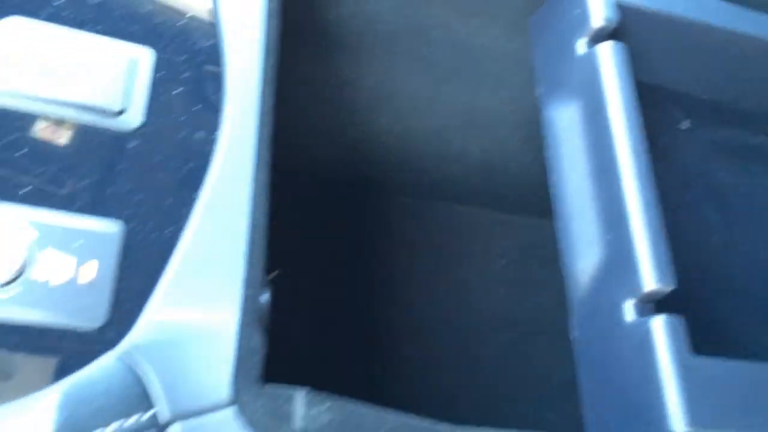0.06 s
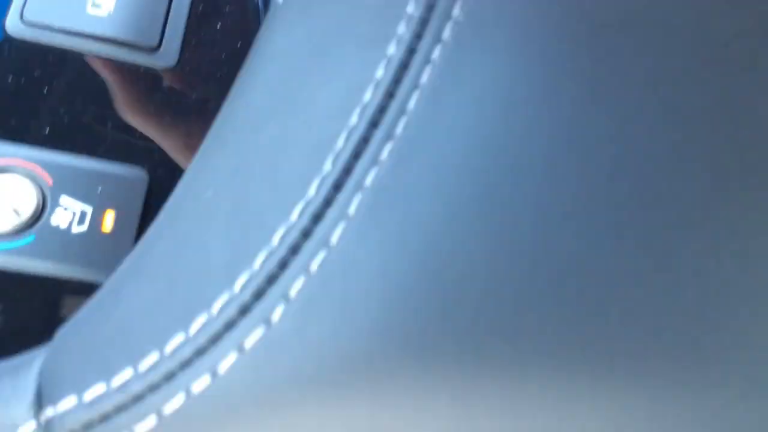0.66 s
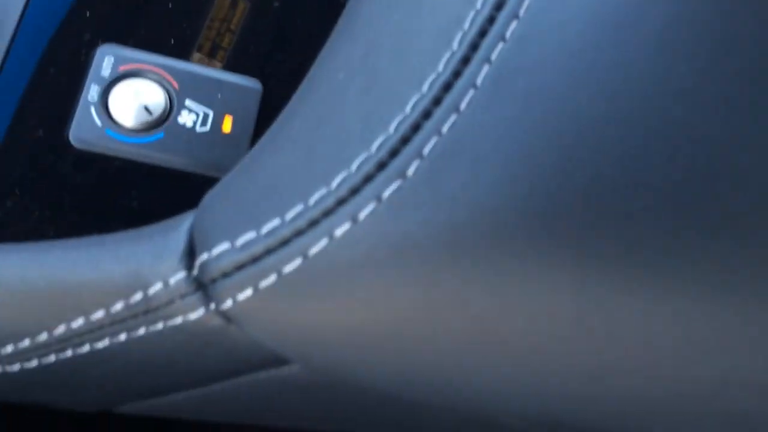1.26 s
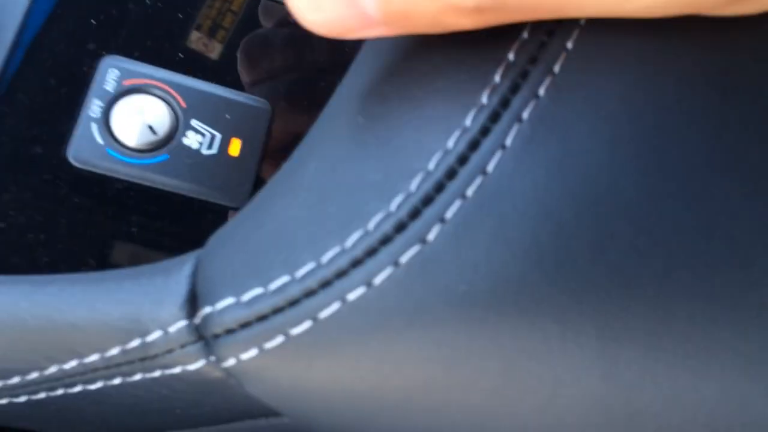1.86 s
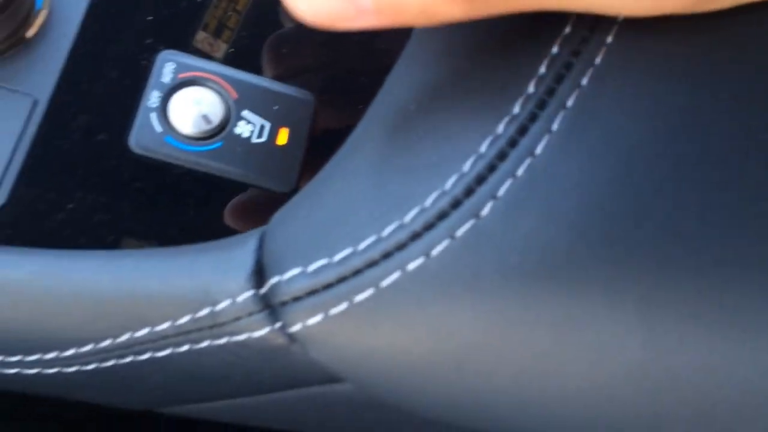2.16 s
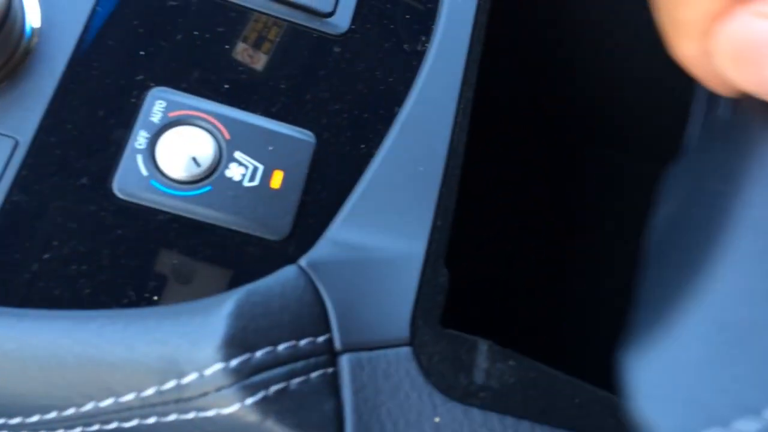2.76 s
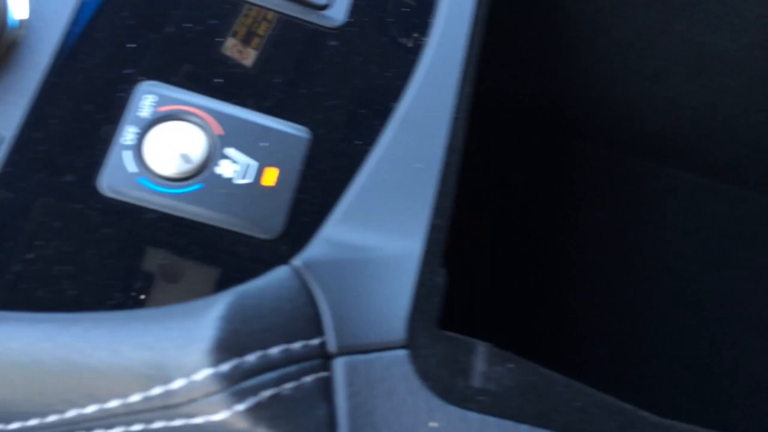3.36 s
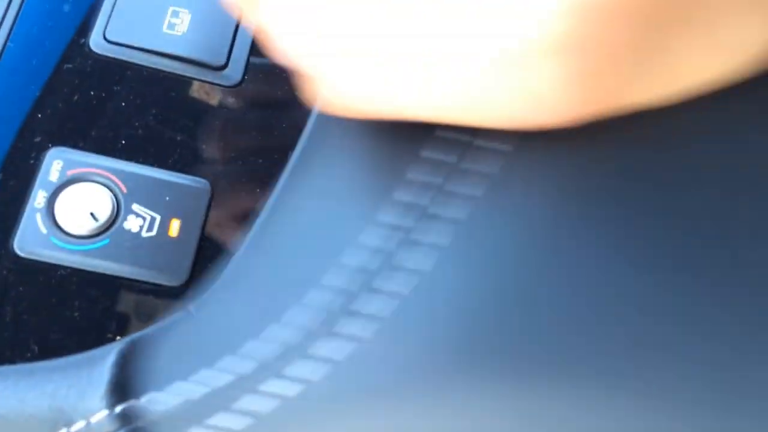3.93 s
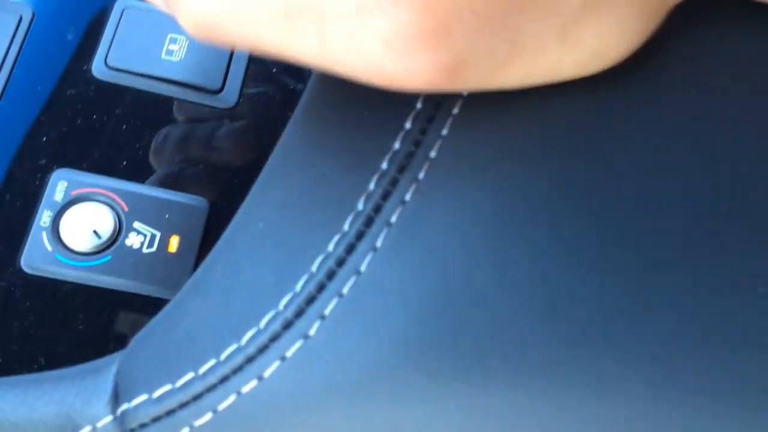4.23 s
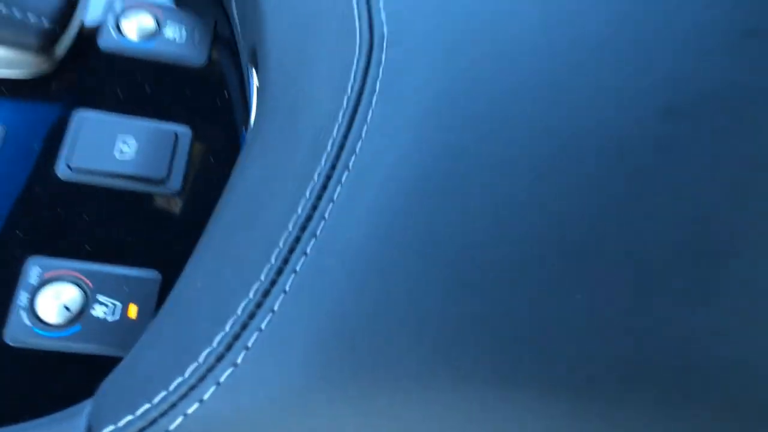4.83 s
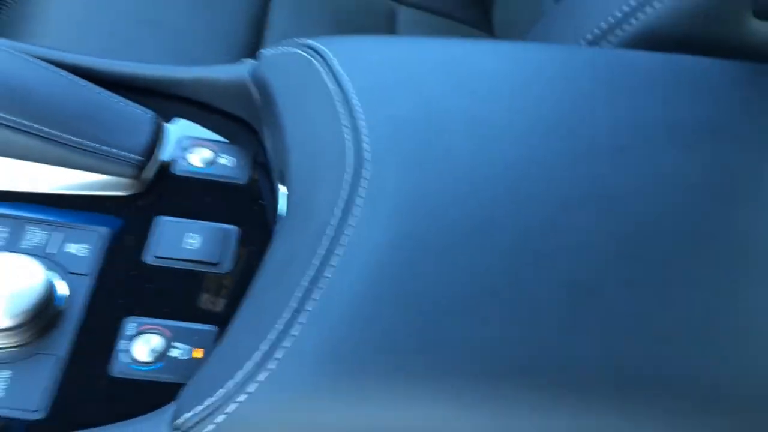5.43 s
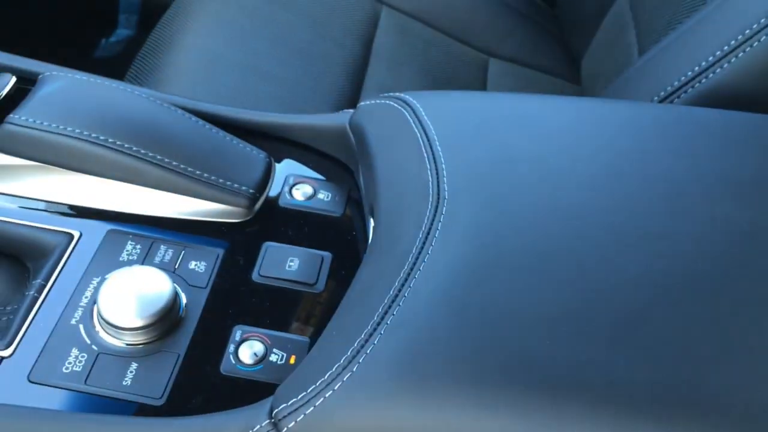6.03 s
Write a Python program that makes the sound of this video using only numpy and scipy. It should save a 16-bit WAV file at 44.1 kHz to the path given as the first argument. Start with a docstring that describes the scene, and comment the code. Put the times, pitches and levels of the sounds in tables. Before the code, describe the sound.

A padded car console lid thuds shut with a plastic latch click, is opened and shut again, with a hand rubbing leather over idling hum.

```python
"""The padded lid of a car's centre console is shut, unlatched, lifted and shut again.
Its hinge rubs, then judders just before the lid thuds down and the plastic latch snaps in.
A hand strokes the leather, fumbles the catch and squeaks as it peels off the lid.
Underneath, the idling engine hums and air rushes softly from the vents."""
import sys
import numpy as np
from scipy import signal
from scipy.fft import rfft, irfft
from scipy.io import wavfile

SR = 44100
rng = np.random.default_rng(int(sys.argv[2]) if len(sys.argv) > 2 else 0)


def generate_wav(signal):
    """Clip the signal to [-1, 1] and save it as 16-bit WAV at the path in sys.argv[1]."""
    frames = np.transpose(np.atleast_2d(signal))
    scaled = np.clip(frames, -1, 1) * 32767
    pcm = np.round(scaled).astype(np.int16)
    wavfile.write(sys.argv[1], SR, pcm)


N = 272917
TIME = np.arange(N) / SR
FREQS = np.maximum(np.fft.rfftfreq(N, 1 / SR), 1)
TOP_HZ = 15400  # upper edge of the treble


def undb(db):
    """Turn decibels into a factor to multiply a sound by."""
    return 10 ** (np.asarray(db) / 20)


def unit(x):
    """Scale a sound so that its average strength (rms) is 1."""
    return x / np.sqrt(np.mean(x ** 2))


def add(track, start, sound):
    """Mix a sound into the track, start seconds in."""
    i = max(int(start * SR), 0)
    track[i:i + len(sound)] += sound[:N - i]


def colour(points):
    """A filter curve that joins (frequency [Hz], level [dB]) points."""
    hz, db = np.transpose(points)
    return undb(np.interp(np.log(FREQS), np.log(hz), db))


def resonances(peaks):
    """A filter curve with a steep peak at each (frequency [Hz], width [Hz], level [dB])."""
    return sum(undb(db) / (1 + ((FREQS - hz * hz / FREQS) / (1.38 * width)) ** 2)
               for hz, width, db in peaks)


def through(x, curve):
    """Pass a sound through a filter curve and scale it to strength 1."""
    return unit(irfft(rfft(x) * curve, N))


def walk(rate):
    """A random wander of about 1 either way, with up to about rate wiggles a second."""
    return 1.2 * np.interp(2 * rate * TIME, np.arange(2048), rng.standard_normal(2048))


def gesture(start, attack, hold, release):
    """One movement, from 0 to 1 and back: it speeds up, holds and slows to rest (times in seconds)."""
    rise = (TIME - start) / max(attack, 1e-3)
    fall = (start + attack + hold + release - TIME) / max(release, 1e-3)
    return np.sin(np.pi / 2 * np.clip(np.minimum(rise, fall), 0, 1))


def slips(per_s, scatter_db):
    """Two rubbing surfaces slip in tiny random clicks of uneven size."""
    size = undb(scatter_db * np.minimum(rng.exponential(size=N), 5))
    return (rng.random(N) < per_s / SR) * size * rng.standard_normal(N)


def flicker(rasp, depth_db, count=12):
    """Each frequency band of the rasp swells and fades at random, so its colour flickers."""
    spectrum = rfft(rasp)
    place = np.interp(np.log(FREQS), np.log([800, TOP_HZ]), [0, count - 1])
    bands = (irfft(spectrum * np.maximum(1 - abs(place - k), 0), N) for k in range(count))
    return unit(sum(band * undb(depth_db * walk(rate=8.3)) for band in bands))


def cabin(air_db=-50, vents_db=-63, throb_db=2.2):
    """The idling engine hums and throbs a little under the soft rush of the vents."""
    # ventilation and distant engine noise: (frequency [Hz], relative level [dB])
    air_curve = [(20, -20), (40, -12.5), (75, 2), (160, 0), (220, -4.5), (450, -8.5), (650, -13.5),
                 (1000, -16.5), (1450, -24), (2100, -23), (2700, -31.5), (5000, -36), (15000, -42.5)]
    # resonances of the air vents: (frequency [Hz], width [Hz], relative level [dB])
    vent_peaks = [(727, 160, 3), (1767, 290, 1.5)]
    # tones of the idling engine: (frequency [Hz], level [dB])
    engine_tones = [(51, -49), (122, -58), (178, -62)]
    (firing_hz, firing_db), *upper_tones = engine_tones
    bass_cut = np.maximum(1 / (1 + (58 / FREQS) ** 4), 0.443)  # leaves the deep bass to the engine tone
    air = undb(air_db) * through(rng.standard_normal(N), colour(air_curve) * bass_cut)
    vents = undb(vents_db) * through(rng.standard_normal(N), resonances(vent_peaks))
    throb = undb(firing_db + throb_db * walk(rate=11))
    firing = throb * np.sin(2 * np.pi * firing_hz * TIME + .1 * walk(rate=2.2))
    drone = 0
    for hz, db in upper_tones:
        swell = undb(db + 2.5 * walk(rate=1.3))
        drone += swell * np.sin(2 * np.pi * hz * TIME + 3.2 * walk(rate=9.2))
    return (air + vents) * undb(.5 * walk(rate=1.6)) + np.sqrt(2) * (firing + drone)


def squeaks(count=14, from_s=4.48, to_s=4.79, low_hz=10700, high_hz=14000, length_s=0.032):
    """Skin peels off the lid in faint, gliding chirps at random moments."""
    out, t = np.zeros(N), TIME[:int(length_s * SR)]
    for when, pitch, glide, size in rng.random((count, 4)):
        slide = 1 + 0.05 * (2 * glide - 1) * t / length_s  # up to 5 % up or down
        hz = (low_hz + pitch * (high_hz - low_hz)) * slide
        chirp = np.hanning(len(t)) * np.sin(2 * np.pi * np.cumsum(hz) / SR)
        db = -70 + 3 * (2 * size - 0.5)
        add(out, from_s + when * (to_s - from_s), undb(db) * chirp)
    return out


def drags():
    """Where a fingertip presses, its slips fall into step and the rasp takes on a pitch."""
    # fingertip chatter: (start [s], length [s], pitch [Hz], width [Hz], level at the middle [dB])
    chatters = [(1.048, 0.082, 3620, 650, -52.5), (1.653, 0.1, 3140, 600, -51),
                (1.788, 0.085, 3270, 600, -60)]
    out = np.zeros(N)
    for start, length, hz, width, db in chatters:
        swell = np.hanning(int(length * SR)) ** .5
        chatter = through(rng.standard_normal(N), resonances([(hz, width, 0)]))
        add(out, start, undb(db) * swell * chatter[:len(swell)])
    return out


def leather(rasp_gain_db=8.0, waver_db=2.3):
    """Countless tiny slips of skin on leather make a fine hiss, and a rasp where the hand presses."""
    # strokes of skin and sleeve:
    # (start [s], rise [s], hold [s], fall [s], hiss level [dB], relative rasp level [dB])
    hand_strokes = [(0.0, 0.0033, 0.045, 0.19, -52, -61), (0.04, 0.3, 0.23, 0.091, -53.5, -52.5),
                    (0.648, 0.034, 0.023, 0.04, -51, -50), (0.899, 0.064, 0.025, 0.038, -46, -56.5),
                    (1.02, 0.031, 0.047, 0.02, -55, -63.5), (1.102, 0.0033, 0.051, 0.097, -42.5, -57),
                    (1.18, 0.22, 0.0067, 0.084, -40.5, -53.5), (1.426, 0.061, 0.011, 0.03, -45.5, -68),
                    (1.489, 0.01, 0.02, 0.096, -56, -53.5), (1.591, 0.1, 0.021, 0.082, -52.5, -52.5),
                    (1.746, 0.11, 0.026, 0.089, -52.5, -53), (1.952, 0.051, 0.016, 0.085, -50, -51),
                    (2.316, 0.073, 0.011, 0.07, -64.5, -60), (2.4, 0.23, 0.1, 0.2, -58, -59.5),
                    (2.718, 0.2, 0.02, 0.28, -56, -58.5), (3.328, 0.14, 0.015, 0.15, -58.5, -59),
                    (3.47, 0.4, 0.15, 0.063, -55.5, -58), (4.006, 0.004, 0.012, 0.059, -48, -51.5),
                    (4.138, 0.028, 0.16, 0.055, -69, -66), (4.345, 0.035, 0.003, 0.022, -52.5, -63),
                    (4.57, 0.023, 0.066, 0.26, -64, -66)]
    # tone of the hiss: (frequency [Hz], relative level [dB])
    hiss_curve = [(1500, -6.5), (2700, -5), (4000, -2.5), (5800, -5), (7500, -2), (11000, 0), (15000, -0.5)]
    # tone of the rasp: (frequency [Hz], relative level [dB])
    rasp_curve = [(350, 12), (750, 3), (1150, 9), (1700, 8.5), (2550, -2.5), (3300, 0), (4600, -2),
                  (7000, -6), (14000, -28)]
    hiss_gain, rasp_gain = 0, 0
    for start, attack, hold, release, hiss_db, rasp_db in hand_strokes:
        sliding = gesture(start, attack, hold, release) ** 1.53  # the power softens both ends
        hiss_gain += undb(hiss_db) * sliding
        rasp_gain += undb(rasp_db) * sliding
    hiss = through(slips(per_s=30000, scatter_db=1), colour(hiss_curve))
    rasp = through(slips(per_s=20000, scatter_db=1), colour(rasp_curve))
    rasp = flicker(rasp, depth_db=2.2)
    return undb(waver_db * walk(rate=25)) * hiss_gain * hiss + undb(rasp_gain_db) * rasp_gain * rasp


def hinge(speed_up_s=0.051, slow_down_s=0.096, upright_fade_db=15.5, bind_db=5.5, gap_db=4.5):
    """The rubbing hinge sounds the lid's hollow body, its panels and, nearly shut, the gap below."""
    # swings of the lid: (start [s], length [s], first opening, last opening [0 shut, 1 upright],
    # first drone level [dB], last drone level [dB], scrape level [dB]); levels are relative
    lid_swings = [(0.061, 0.627, 0.56, 0.24, -48, -35, -36.5), (2.383, 0.708, 0.13, 0.49, -44, -38.5, -49),
                  (3.353, 0.675, 1, 0, -48.5, -45.5, -42)]
    # the hand pushes harder and the hinge rubs louder: (middle [s], length [s], boost [dB])
    hand_pushes = [(0.393, 0.12, 8.5), (0.532, 0.11, 3), (2.597, 0.2, 5), (3.893, 0.22, 2)]
    # drone of the hollow body: (frequency [Hz], width [Hz], relative level [dB])
    body_peaks = [(111, 51, -4.5), (217.2, 27, 2.5), (299, 88, -9.5), (575, 44, -12)]
    # scrape of the panels: (frequency [Hz], width [Hz], relative level [dB])
    panel_peaks = [(385, 15, 0.5), (546, 55, 3.5), (800, 300, -3.5), (1048, 280, -15), (1220, 27, -21),
                   (1530, 400, -6), (6230, 1100, -38.5)]
    # air in the narrow gap: (frequency [Hz], width [Hz], relative level [dB])
    gap_peaks = [(1077, 190, 1.5), (882, 120, -8), (1750, 110, -15.5), (6500, 1000, -28)]
    push_db = sum(db * gesture(middle - length / 2, length / 2, 0, length / 2) ** 2
                  for middle, length, db in hand_pushes)
    drone_gain, scrape_gain, gap_gain = 0, 0, 0
    for start, length, first, last, first_db, last_db, scrape_db in lid_swings:
        span = [start, start + length]
        steady_s = length - speed_up_s - slow_down_s
        moving = undb(push_db) * gesture(start, speed_up_s, steady_s, slow_down_s)
        opening = np.interp(TIME, span, [first, last])
        free = .5 + .5 * np.tanh((opening - 0.36) / 0.055)  # below 0.36 the hinge binds, scraping harder
        rubbing = moving * undb(scrape_db - upright_fade_db * opening - bind_db * free)
        drone_gain += moving * undb(np.interp(TIME, span, [first_db, last_db]))
        scrape_gain += rubbing
        gap_gain += rubbing * (1 - free)
    body = through(slips(per_s=1300, scatter_db=-1.2), resonances(body_peaks))
    panels = through(slips(per_s=6000, scatter_db=2.6), resonances(panel_peaks))
    gap = undb(gap_db) * through(slips(per_s=3300, scatter_db=-3.5), resonances(gap_peaks))
    drone = undb(1.1 * walk(rate=9)) * drone_gain * body
    scrape = undb(2.46 * walk(rate=12)) * (scrape_gain * panels + gap_gain * gap)
    return drone + scrape


def judders():
    """The hinge sticks and slips a few times and shakes the lid like a drumhead."""
    # grabs of the hinge: (start [s], length [s], average slip rate [Hz], peak level [dB])
    hinge_grabs = [(.605, 0.022, 206, -9), (.626, 0.029, 172, -26), (.659, 0.039, 181.5, -15.5),
                   (3.931, 0.019, 211, -9.5), (3.952, 0.038, 176, -18.5), (3.978, 0.021, 221, -19)]
    out = np.zeros(N)
    for start, length, hz, db in hinge_grabs:
        t = np.arange(int(length * SR)) / SR
        phase = 2 * np.pi * hz * t * (1 + 0.25 * (1 - t / length))  # the slips slow as the lid brakes
        swell = np.sin(np.pi * t / length) ** 0.47
        shake = np.sin(phase) + undb(-26.5) * np.sin(2 * phase) + undb(-30.0) * np.sin(3 * phase)
        add(out, start, undb(db) * swell * shake)
    return out


def knocks(crack_s=.0011, tail_s=0.018, tail_db=-15, edge_db=7, max_cut_db=44, contact_s=0.000184):
    """Each latch knock cracks and rings those tones of the plastic that its hardness and place favour."""
    # ringing tones of the plastic console: (frequency [Hz], relative level [dB])
    shell_tones = [(390, 8.5), (553, 2), (655, 6.5), (850, 3), (1005, 4.5), (1120, 2), (1280, -14.5),
                   (1675, -8.5), (1790, -4.5), (2030, -8.5), (2210, -16.5), (2390, -15.5), (2700, -15.5),
                   (3160, -9), (3360, -10), (3830, -21), (4050, -74), (4610, -27.5), (5530, -18),
                   (6110, -21)]
    # knocks of latch and catch: (time [s], level of the first 5 ms [dB], centre [Hz],
    # spread [octaves], ring length [factor], relative crack level [dB])
    latch_hits = [(0.408, -31.5, 850, 1.06, 0.63, -12), (0.547, -30, 1740, 0.68, 0.67, -8),
                  (0.6833, -32, 1090, 0.35, 0.4, -19), (.6903, -15, 2990, 0.65, 0.65, -10),
                  (.6905, -28, 9000, 0.94, 0.7, 14), (.6922, -21.5, 1260, 1.24, 0.6, -4.5),
                  (0.696, -18.5, 438, 0.5, 0.67, -5), (0.71, -31, 3400, 1.1, 0.32, -15),
                  (1.511, -38.5, 2500, 0.46, 1.25, -5.5), (1.512, -29, 970, 0.11, 0.32, -3),
                  (1.7881, -27.5, 930, 0.72, 0.39, 0.5), (1.9011, -31.5, 3700, 1.01, 0.4, -8.5),
                  (2.332, -45, 2160, 1.5, 0.47, -32), (2.905, -41, 1200, 2.1, 0.46, -8.5),
                  (3.33, -56.5, 5030, 0.63, 1.1, 5), (3.977, -37, 1840, 0.71, 1.8, -1),
                  (4.007, -24.5, 404, 0.65, 0.68, 1.5), (4.0109, -24.5, 1560, 0.32, 0.38, -2.5),
                  (4.0111, -37.5, 4980, 1.1, 0.79, 7), (4.056, -41, 10600, 0.99, .3, 12),
                  (4.057, -39, 980, 0.19, .6, 9), (4.659, -47.5, 9600, 0.97, 0.59, 0),
                  (6.09, -51.5, 10160, 0.57, 0.27, 8)]
    out, t = np.zeros(N), TIME[:SR // 4]
    hz, tone_db = np.transpose(shell_tones)[:, :, None]
    ring_s = 0.077 * (hz / 1000) ** -0.7  # higher tones die sooner
    crack_hz = np.maximum(np.fft.rfftfreq(len(t), 1 / SR), 1)
    for start, db, centre, spread, stretch, crack_db in latch_hits:
        def favour(f):
            """Turn down frequencies far from this knock's centre."""
            distance = np.log2(f / centre) / spread
            return undb(-max_cut_db * np.tanh(edge_db * distance ** 2 / max_cut_db))

        fade = np.exp(-np.log(1000) * t / (ring_s * stretch))
        tones = favour(hz) * undb(tone_db) * fade * np.sin(2 * np.pi * hz * t)
        reach = min(1, hz.max() / centre) ** 2  # the finest ticks barely move the plastic
        ringing = reach * unit(tones.sum(axis=0))
        # the crack scatters round the cabin and dies quickly in the upholstery
        decay = np.exp(-t / crack_s) + undb(tail_db) * np.exp(-t / (tail_s * stretch))
        crack = decay * irfft(rfft(rng.standard_normal(len(t))) * favour(crack_hz), len(t))
        knock = (ringing + undb(crack_db) * unit(crack)) * (1 - np.exp(-t / contact_s))
        add(out, start, undb(db) * knock / knock[:SR // 200].std())
    return out


def thuds(build_s=0.0011, low_cut_hz=44):
    """The padded lid lands with a soft push, and a boom builds up in the bin and the cabin air."""
    # low tones of the bin and the cabin air: (frequency [Hz], relative level [dB], time to fade 60 dB [s])
    boom_tones = [(56.6, -6, 0.25), (80, 4, 0.14), (120.6, 0.5, 0.13), (178.5, 2.5, 0.092),
                  (258, -2, 0.095)]
    # the lid landing: (time [s], level [dB], length of contact [s])
    landings = [(0.6952, -10, 0.0028), (0.701, -10.5, 0.004), (3.998, -14, 0.0064), (4.0065, -15, 0.0028),
                (4.035, -27, 0.00077), (4.147, -38.5, 0.003)]
    out, t = np.zeros(N), TIME[:SR // 2]
    boom = sum(undb(db) * np.exp(-np.log(1000) * t / ring_s) * np.cos(2 * np.pi * hz * t)
               for hz, db, ring_s in boom_tones)
    boom *= 1 - np.exp(-t / build_s)
    for start, db, contact_s in landings:
        push = np.sin(np.pi * np.minimum(t / contact_s, 1))
        thud = signal.fftconvolve(boom, push)[:len(t)]
        add(out, start, undb(db) * thud / np.abs(thud).max())
    return signal.sosfilt(signal.butter(4, low_cut_hz, "high", fs=SR, output="sos"), out)


def scene():
    """Everything is close by in the padded cabin, mixed to one channel."""
    return (hinge() + leather() + drags() + squeaks() + judders() + thuds() + knocks() + cabin())[None]


def record(dry):
    """A steep filter cuts off the highest treble."""
    return signal.sosfilt(signal.ellip(10, .2, 80, TOP_HZ, fs=SR, output="sos"), dry)


dry = scene()
out = record(dry)
generate_wav(out)
```